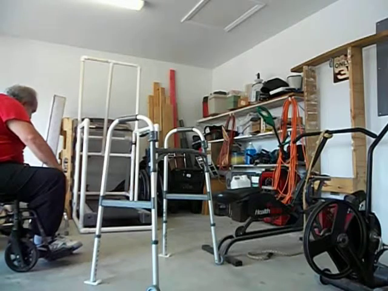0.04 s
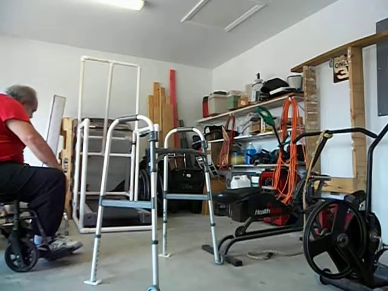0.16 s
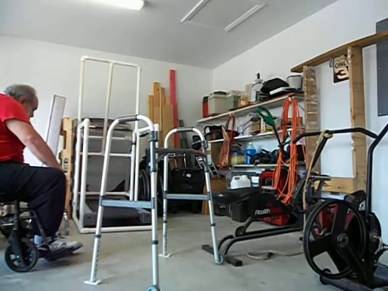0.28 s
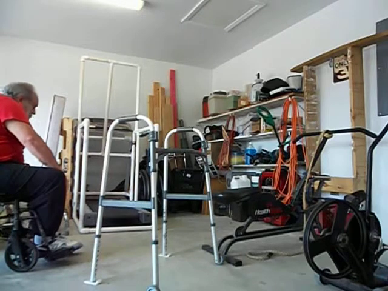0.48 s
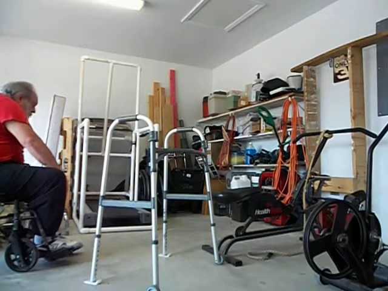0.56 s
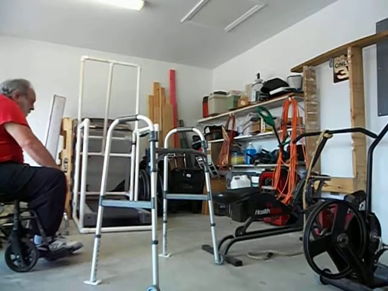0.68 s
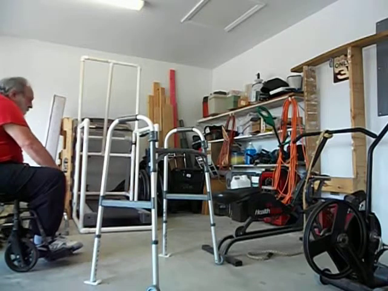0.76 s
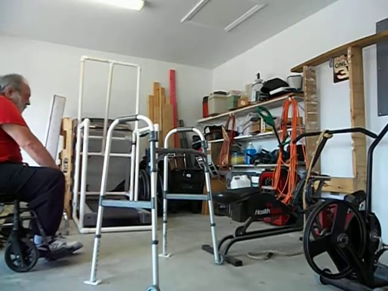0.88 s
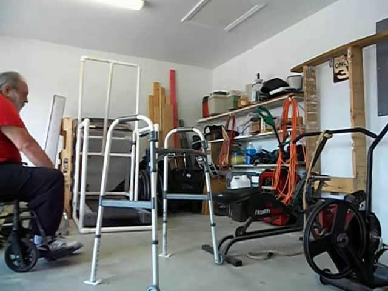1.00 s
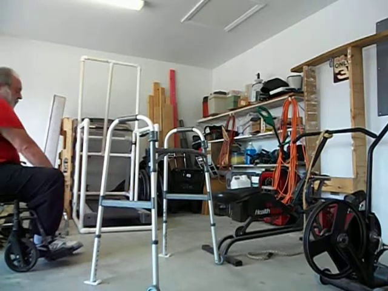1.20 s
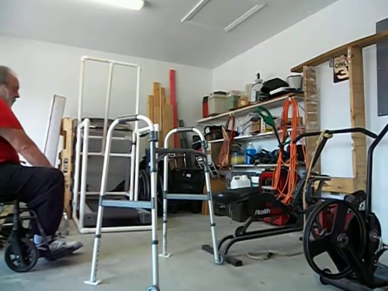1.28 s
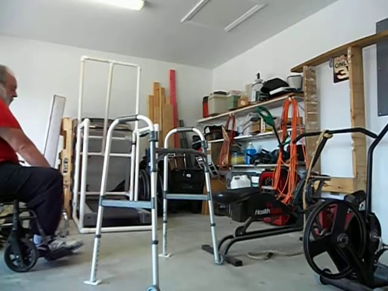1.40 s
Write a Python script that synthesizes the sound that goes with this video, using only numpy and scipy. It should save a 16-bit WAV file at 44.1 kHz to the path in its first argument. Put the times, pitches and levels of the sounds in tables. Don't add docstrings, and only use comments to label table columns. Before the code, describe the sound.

A wheelchair's loose metal parts knock and rattle in three quick clusters, loud, loud, then weaker, a few metres from the microphone in a hard, echoing garage, over a continuous low motor hum and fan rush.

```python
import sys
import numpy as np
from scipy import signal
from scipy.fft import rfft, irfft, next_fast_len
from scipy.io import wavfile
from scipy.ndimage import uniform_filter1d

SR = 44100
rng = np.random.default_rng(int(sys.argv[2]) if len(sys.argv) > 2 else 0)


def attenuation_scalar(level_db):
    decades = np.asarray(level_db, float) / 20
    return 10 ** decades


def store_wav(level_fs):
    pcm = np.round(np.clip(np.atleast_2d(level_fs), -1, 1) * 32767)
    wavfile.write(sys.argv[1], SR, pcm.T.astype(np.int16))


N = 63945

# multiple of the turning rate, level/dB
MOTOR_HARMONICS = [(1, -53.5), (2, -43), (3, -47.5), (4, -45.5), (5, -50)]
MOTOR_HZ, MOTOR_WOBBLE, MOTOR_FLUTTER_DB = 73.5, 0.008, 3.5

# f/Hz, level/dB
RUSH_SPECTRUM = [(15, -64), (28, -17), (139, -12), (250, -16.5), (360, -7), (440, -12.5), (2000, -22),
                 (3600, -31), (7300, -53), (9000, -90)]
RUSH_DB = -30.5
# f/Hz, width/Hz, level/dB
DUCT_MODES = [(390, 81, -47), (462.2, 23, -42), (220, 23, -60)]

# f/Hz, T60/s
ROOM_T60 = [(150, 0.36), (600, 0.33), (2500, .5), (7000, 0.33)]
ROOM_GAP_S, ROOM_RISE_S = 0.0054, 0.0041
RATTLE_ROOM_DB, KNOCK_ROOM_DB = -5.5, -10

# t/s, level/dB, f/Hz, T60/s, overtone level/dB
TYRE_THUDS = [
    (.203, -22.5, 194.6, 0.11, -7),
    (.222, -28.5, 89.1, 0.071, -7),
    (.565, -21.5, 273, 0.09, -2.5),
    (.62, -30, 108.9, 0.2, 3.5),
    (.65, -23.5, 307, 0.041, 7),
    (.89, -30, 120, .15, -2),
]
# t/s, level/dB, f/Hz, T60/s, overtone level/dB
TUBE_KNOCKS = [(.1980, -12.5, 552, .3, -20), (.2161, -18, 552, .15, -8), (.2306, -2, 552, .045, -14),
               (.2415, -15, 552, .16, -6), (.2678, -13, 552, .13, -14), (.301, -18, 560, .08, -12),
               (.3615, -17, 490, .03, -12), (.537, -22, 620, .05, -6), (.5445, -9.5, 640, .055, -7),
               (.553, -7, 740, .03, -6), (.559, -16, 635, .15, -6), (.5955, -14, 500, .03, -8),
               (.624, -19, 640, .06, -8), (.633, -5, 700, .045, -13), (.6425, -4, 760, .025, -8),
               (.647, -9, 720, .055, -14), (.6545, -4, 720, .05, -14), (.672, -12, 640, .035, -10),
               (.680, -13, 660, .15, -10), (.886, -18, 790, .06, -14), (.8955, -17.5, 720, .06, -14),
               (.909, -19.5, 770, .06, -14), (.96, -28, 540, .1, -12), (1.043, -19, 400, .022, -12)]
OVERTONE_RATIO, KNOCK_BUZZ_DB, KNOCK_RISE_S = 1.7, 1.2, 0.002

# f/Hz, width/Hz, level/dB
FOOTREST_MODES = [(930, 70, 0), (1350, 450, -1), (2200, 350, 1), (2950, 700, -3), (3700, 500, -9),
                  (5200, 1000, -13), (7000, 800, -19)]
FRAME_MODES = [(1130, 300, 2), (1580, 300, -6), (2690, 400, -4), (3550, 450, -6), (4600, 600, -11),
               (5870, 350, -3), (6600, 500, -13)]
AXLE_MODES = [(1000, 250, 0), (1400, 200, -4), (2900, 500, -9), (5200, 500, -10)]
LATCH_MODES = [(1150, 400, -2), (1600, 400, -3), (2400, 500, -6), (3150, 1000, -2), (4750, 450, -8),
               (5960, 250, -6), (7000, 700, -18)]
FORK_MODES = [(1500, 500, -2), (2600, 500, 0), (3400, 500, -2), (5050, 500, -5)]

# t/s, level/dB, rattle decay/s, crack level over ringing/dB
FOOTREST_SHAKES = [
    (0.178, -26.5, 0.0081, -14.5),
    (0.195, -28.5, 0.018, 7),
    (0.204, -19, 0.045, -1),
    (0.221, -18, 0.0083, -3.5),
    (0.233, -20.5, 0.0098, 1),
    (0.268, -26, 0.0073, -4),
    (0.279, -34, 0.021, 19),
]
FRAME_SHAKES = [
    (0.534, -22, 0.02, 0.031),
    (0.548, -18, 0.016, 0.026),
    (0.57, -35.5, 0.038, 0),
]
AXLE_SHAKES = [
    (.622, -34, 0.024, 0.018),
    (0.632, -18, .015, 0.019),
    (0.652, -21, 0.013, 0.017),
]
LATCH_SHAKES = [
    (0.692, -21, .014, 0.036),
    (.705, -23.5, 0.027, 6.5),
    (0.731, -31, 0.008, 0),
]
FORK_SHAKES = [
    (.879, -24.5, 0.017, 0),
    (0.896, -37, 0.033, 1),
    (0.946, -34, 0.018, 0.004),
    (0.961, -31, .02, 6),
]
# f/Hz, level/dB
CRACK_SPECTRUM = [(100, -36), (300, -7.5), (600, -3.5), (1200, -10.5), (2200, -15), (4200, -21.5),
                  (5800, -27), (7600, -41)]
CONTACTS_PER_S, CONTACT_SPREAD_DB, RATTLE_RISE_S = 16000, 1.5, 0.005

PORT_LAG_S = 63e-6
TOP_HZ, TOP_SHELF_DB = 7680, -30


def unit(x):
    return x / np.sqrt(np.mean(x ** 2))


def along(table, hz):
    t = np.array(table)
    return np.interp(np.log(hz + 1), np.log(t[:, 0]), t[:, 1])


def colour(x, table):
    gain = attenuation_scalar(along(table, np.fft.rfftfreq(len(x), 1 / SR)))
    return irfft(rfft(x) * gain, len(x))


def ring(x, hz, width):
    q = np.clip(hz / width, 1, 400)
    return signal.lfilter(*signal.iirpeak(hz, q, SR), x)


def walk(rate):
    hold = int(SR / rate)
    steps = np.repeat(rng.standard_normal(N // hold + 1), hold)
    smooth = uniform_filter1d(uniform_filter1d(steps, hold), hold)
    return unit(smooth[:N])


def motor():
    speed_hz = MOTOR_HZ * (1 + MOTOR_WOBBLE * walk(4.1))
    turn = 2 * np.pi * np.cumsum(speed_hz) / SR
    tones = 0
    for k, db in MOTOR_HARMONICS:
        level = np.sqrt(2) * attenuation_scalar(db + MOTOR_FLUTTER_DB * walk(13.46))
        tones = tones + level * np.sin(k * turn + k * k)
    return tones


def fan():
    rush, ducts = 0, 0
    for hz in 30 * 2 ** np.arange(0, 8.5, 0.5):
        swell = attenuation_scalar(1.0 * walk(23))
        band = ring(rng.standard_normal(N), hz, hz / 3.25)
        rush = rush + swell * colour(band, RUSH_SPECTRUM)
    for hz, width, db in DUCT_MODES:
        ducts = ducts + attenuation_scalar(db + 2.0 * walk(7.1)) * unit(ring(rng.standard_normal(N), hz, width))
    return ducts + attenuation_scalar(RUSH_DB - 3) * unit(rush)


def garage(x, wet_db):
    t = np.arange(SR) / SR
    tail = 0
    for hz in 60 * 2 ** np.arange(0, 7.5, 0.5):
        decay = attenuation_scalar(-60 * t / along(ROOM_T60, hz))
        tail = tail + ring(rng.standard_normal(SR), hz, hz / 2.26) * decay
    tail = tail * (1 - np.exp(-np.clip(t - ROOM_GAP_S, 0, 1) / ROOM_RISE_S))
    echoes = signal.fftconvolve(x, tail / np.linalg.norm(tail))[:N]
    return x + attenuation_scalar(wet_db) * echoes


def knocks(table):
    def mode(age, hz, t60):
        return np.sin(2 * np.pi * hz * age) * attenuation_scalar(-60 * age / t60)

    out = 0
    for start, db, hz, t60, over_db in table:
        age = np.clip(np.arange(N) / SR - start, 0, 2)
        rise = 1 - np.exp(-age / KNOCK_RISE_S)
        overtone = attenuation_scalar(over_db) * mode(age, hz * OVERTONE_RATIO, t60 * 1.05)
        out = out + attenuation_scalar(db) * rise * (mode(age, hz, t60) + overtone)
    return out * attenuation_scalar(KNOCK_BUZZ_DB * walk(119.8))


def body(x, modes):
    return sum((-1) ** k * attenuation_scalar(db) * ring(x, hz, width) for k, (hz, width, db) in enumerate(modes))


def rattle(modes, shakes):
    t = np.arange(N) / SR
    contacts = (rng.random(N) < CONTACTS_PER_S / SR) * rng.choice([-1, 1], N)
    contacts = contacts * attenuation_scalar(CONTACT_SPREAD_DB * rng.exponential(size=N))
    ringing, cracking = np.zeros(N), np.zeros(N)
    for start, db, length, crack_db in shakes:
        age = np.clip(t - start, 0, 1)
        push = contacts * np.exp(-age / max(length, 1e-3)) * (1 - np.exp(-age / RATTLE_RISE_S))
        ringing += attenuation_scalar(db) * push
        cracking += attenuation_scalar(db + crack_db) * push
    cracking = cracking * rng.choice([-1, 1], N)

    pulse = 1.0 * (np.arange(4096) == 0)
    rung = body(ringing, modes) / np.linalg.norm(body(pulse, modes))
    cracked = colour(cracking, CRACK_SPECTRUM) / np.linalg.norm(colour(pulse, CRACK_SPECTRUM))
    return rung + cracked


def wheelchair():
    return (rattle(FOOTREST_MODES, FOOTREST_SHAKES) + rattle(FRAME_MODES, FRAME_SHAKES)
            + rattle(AXLE_MODES, AXLE_SHAKES) + rattle(LATCH_MODES, LATCH_SHAKES)
            + rattle(FORK_MODES, FORK_SHAKES))


def scene():
    chair = wheelchair()
    background = motor() + fan()
    rattles = garage(chair, RATTLE_ROOM_DB)
    blows = garage(knocks(TUBE_KNOCKS) + knocks(TYRE_THUDS), KNOCK_ROOM_DB)
    return np.tile(background + rattles + blows, (2, 1))


def top_cut(x):
    return signal.sosfilt(signal.butter(12, 8910, fs=SR, output="sos"), x)


def record(dry):
    size = next_fast_len(N + 4096)
    hz = np.fft.rfftfreq(size, 1 / SR)
    rounded = 1.3 * np.tanh(dry / 1.3)
    bright = 1 / np.clip(np.cos(np.pi * hz * PORT_LAG_S), 0.1, 1)
    lag = np.exp(-1j * np.pi * hz * PORT_LAG_S * np.array([[1], [-1]]))
    shelf_db = TOP_SHELF_DB / (1 + np.exp((TOP_HZ - hz) / 30))
    cut = attenuation_scalar(shelf_db - np.clip(hz - 8800, 0, 600) / 10)
    mix = irfft(rfft(rounded, size) * bright * lag * cut, size)[:, :N]
    return top_cut(mix)


dry = scene()
out = record(dry)
store_wav(out)
```